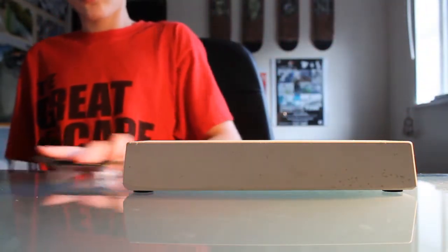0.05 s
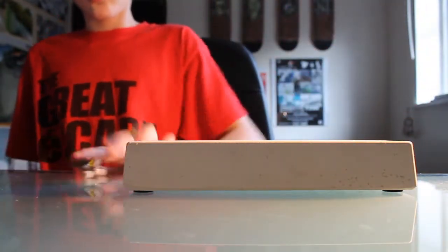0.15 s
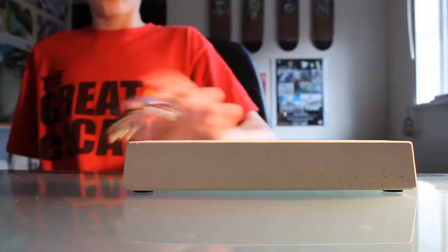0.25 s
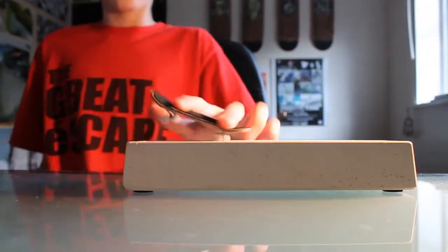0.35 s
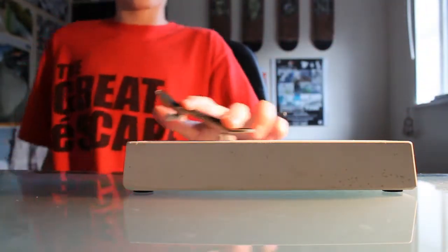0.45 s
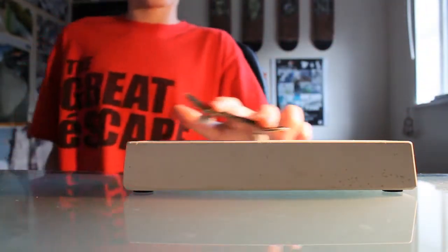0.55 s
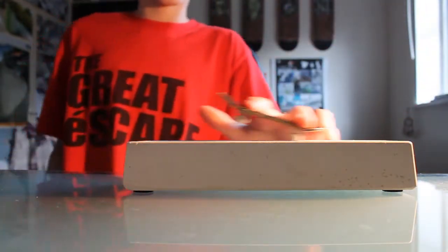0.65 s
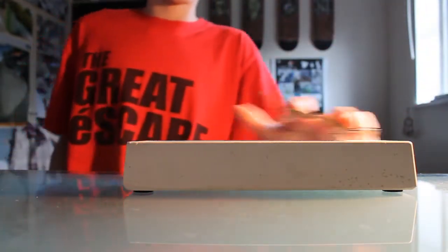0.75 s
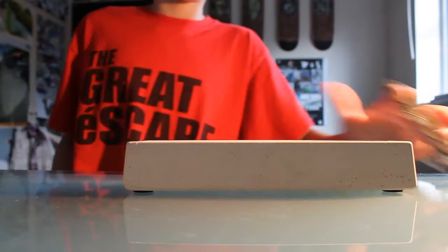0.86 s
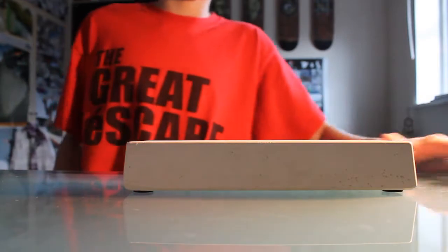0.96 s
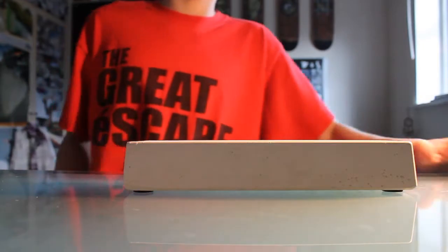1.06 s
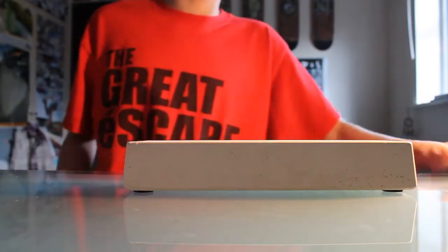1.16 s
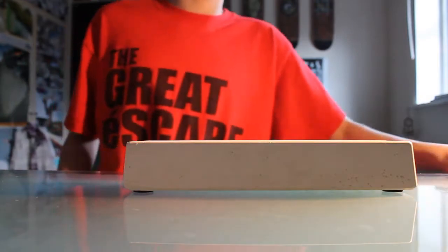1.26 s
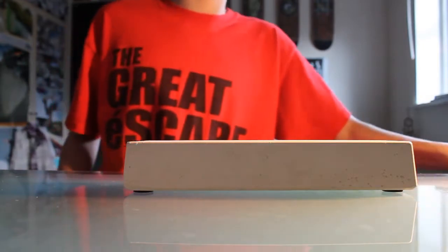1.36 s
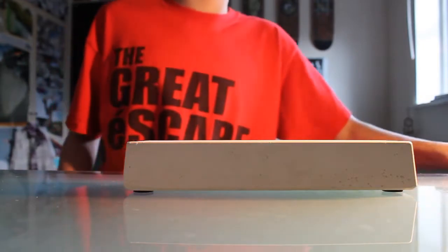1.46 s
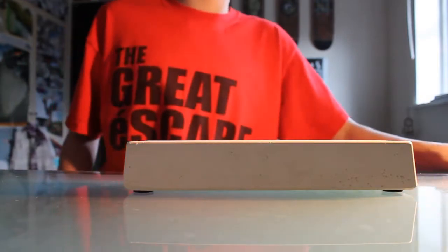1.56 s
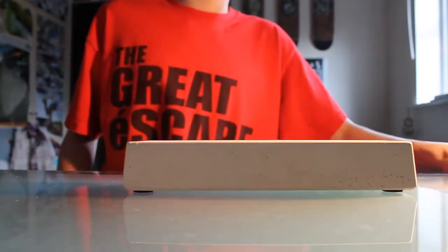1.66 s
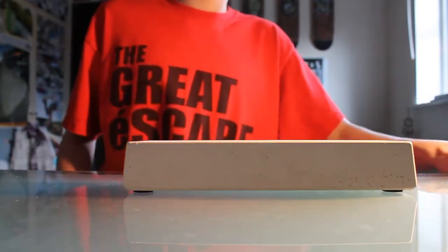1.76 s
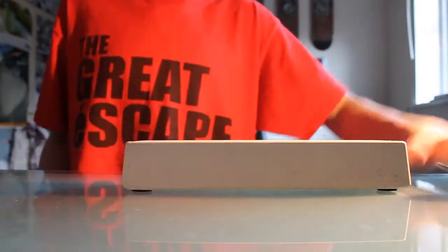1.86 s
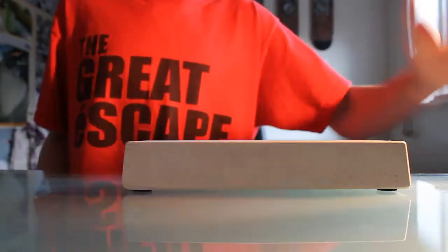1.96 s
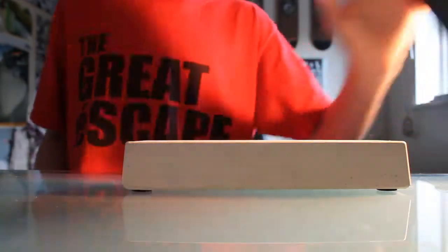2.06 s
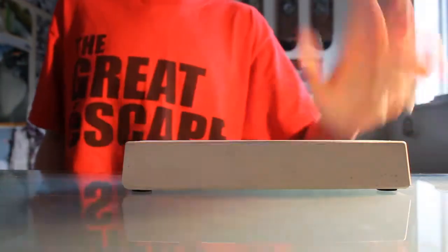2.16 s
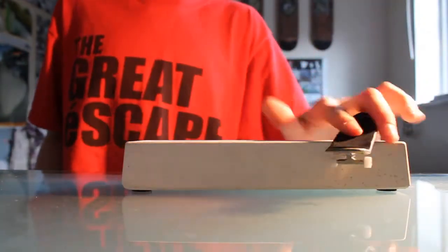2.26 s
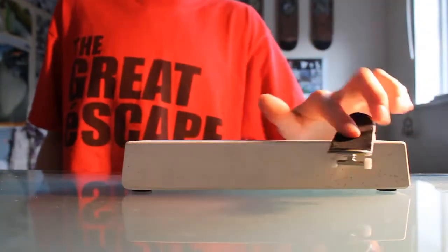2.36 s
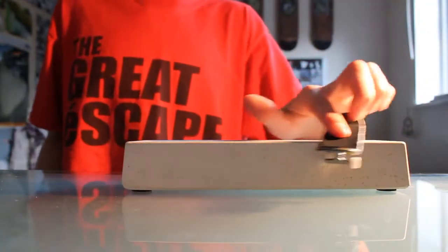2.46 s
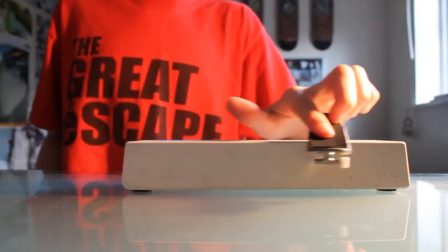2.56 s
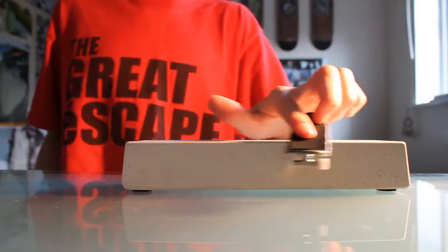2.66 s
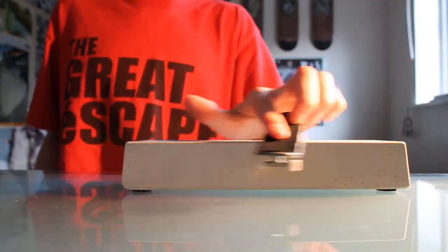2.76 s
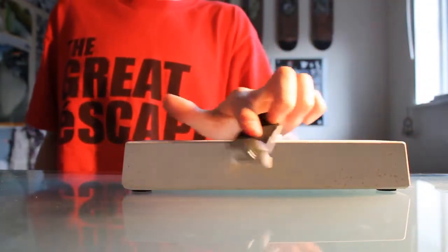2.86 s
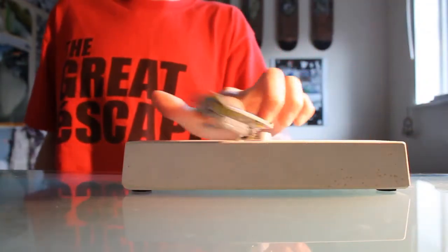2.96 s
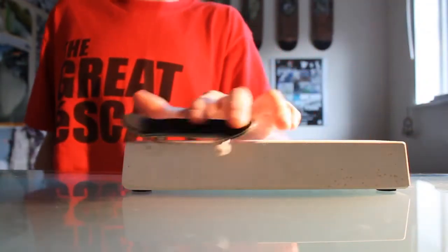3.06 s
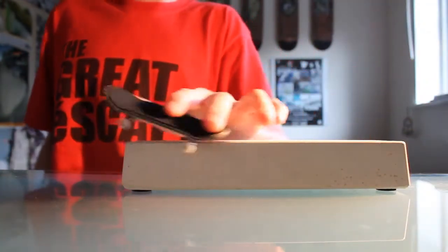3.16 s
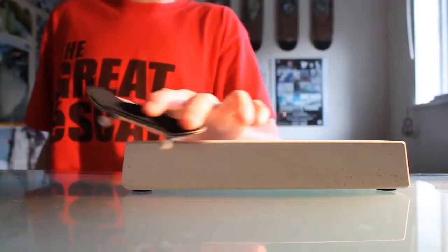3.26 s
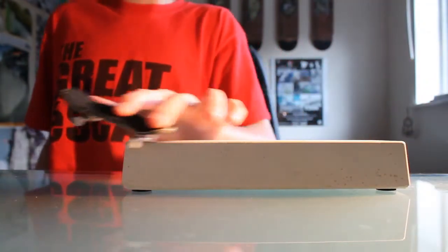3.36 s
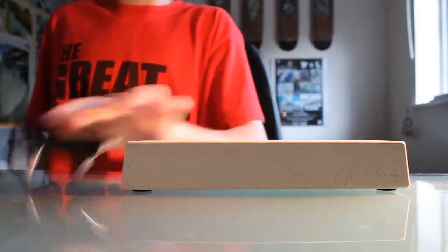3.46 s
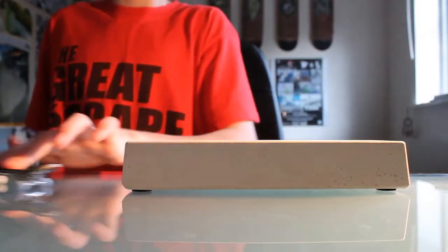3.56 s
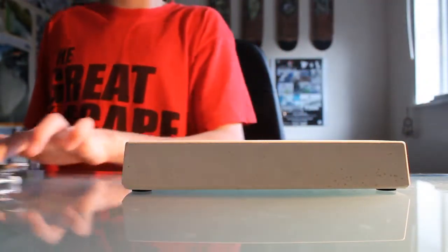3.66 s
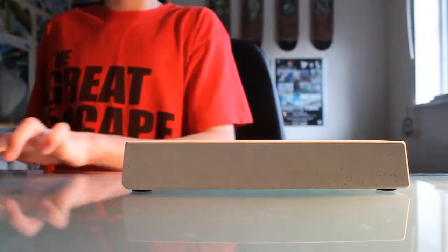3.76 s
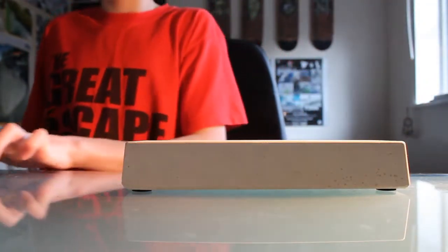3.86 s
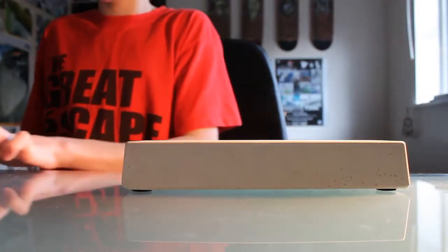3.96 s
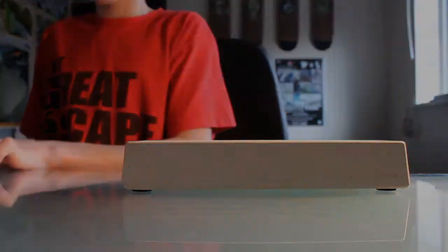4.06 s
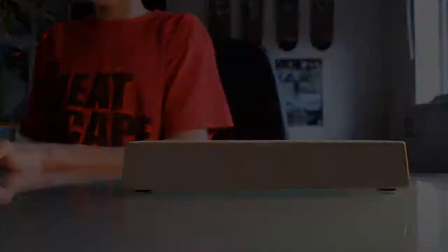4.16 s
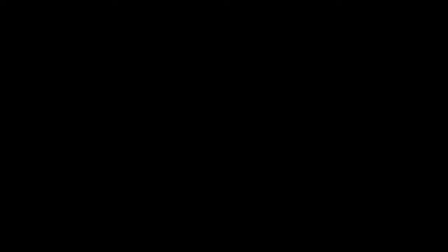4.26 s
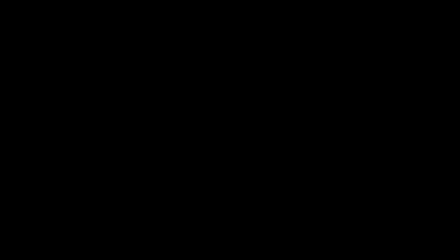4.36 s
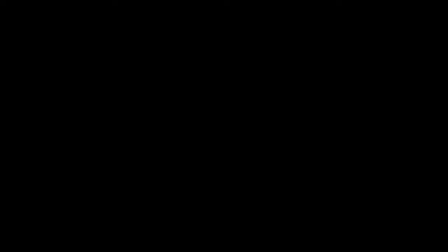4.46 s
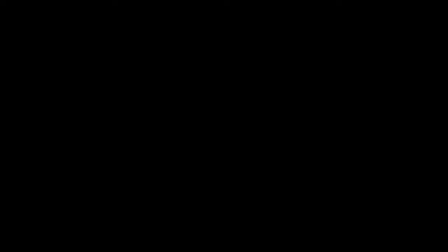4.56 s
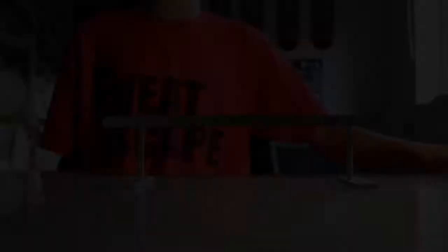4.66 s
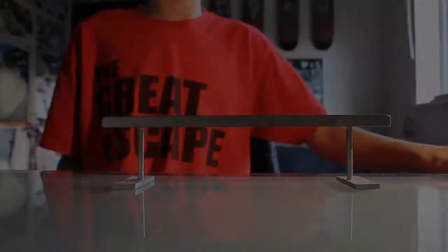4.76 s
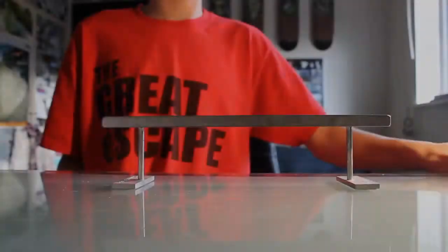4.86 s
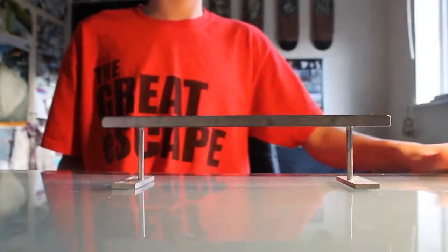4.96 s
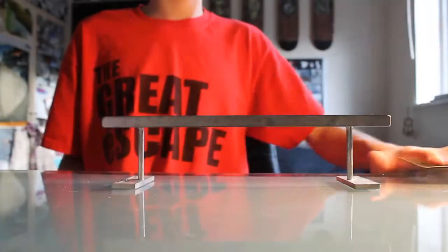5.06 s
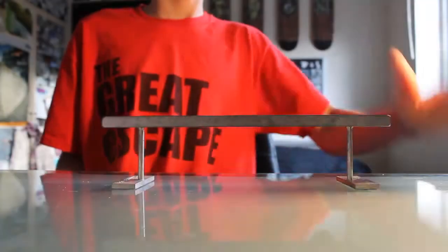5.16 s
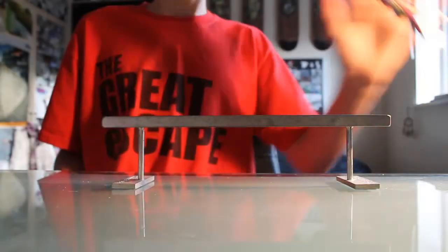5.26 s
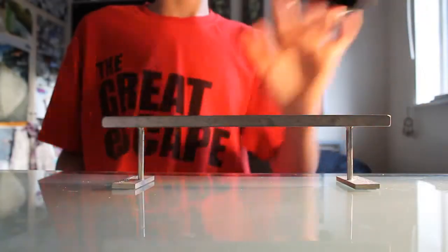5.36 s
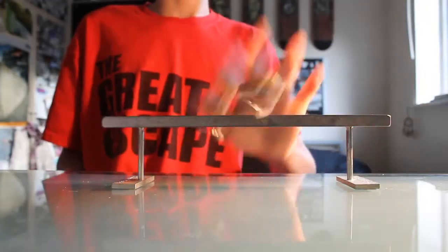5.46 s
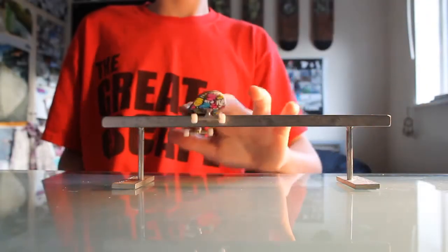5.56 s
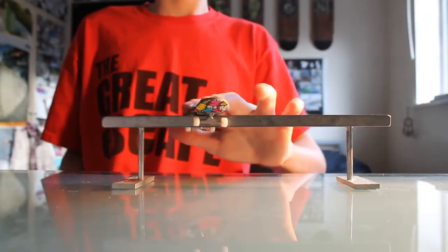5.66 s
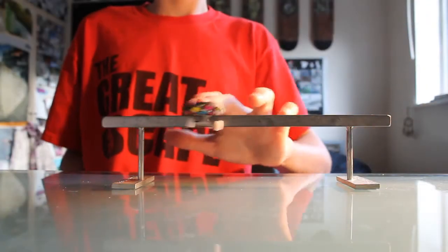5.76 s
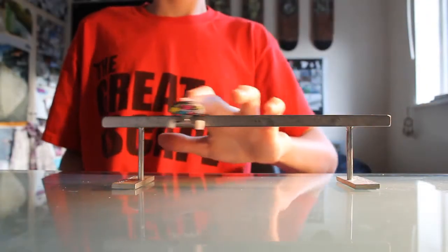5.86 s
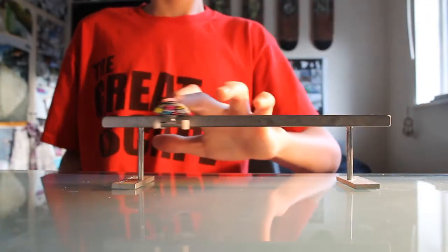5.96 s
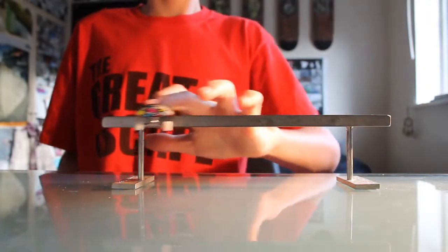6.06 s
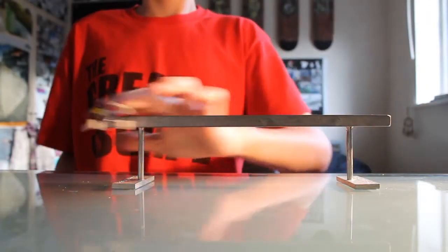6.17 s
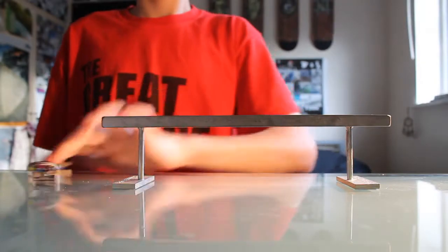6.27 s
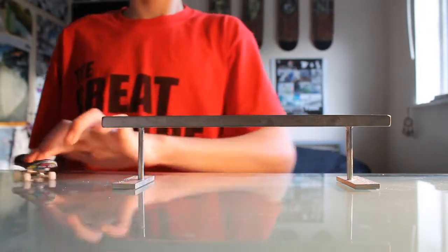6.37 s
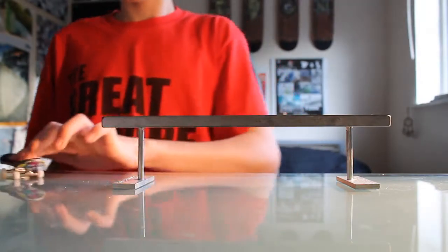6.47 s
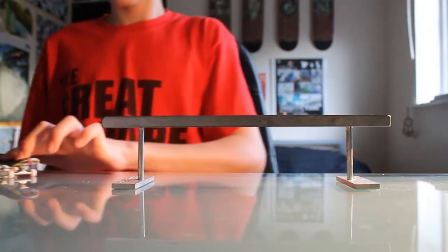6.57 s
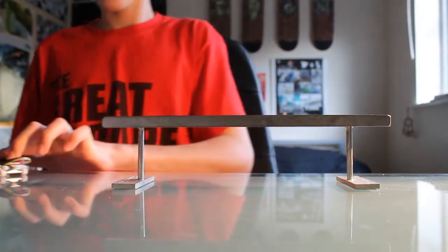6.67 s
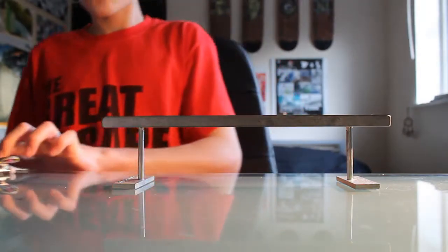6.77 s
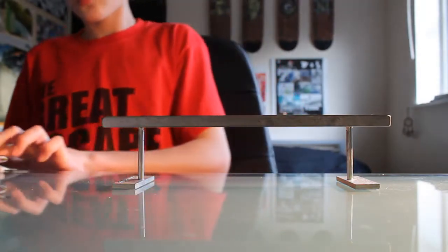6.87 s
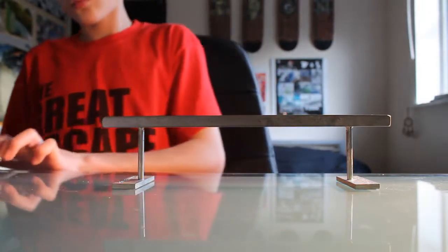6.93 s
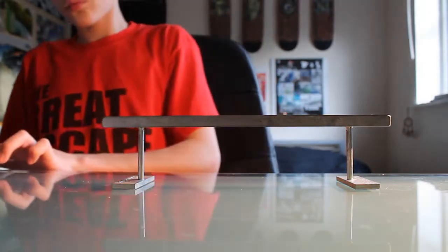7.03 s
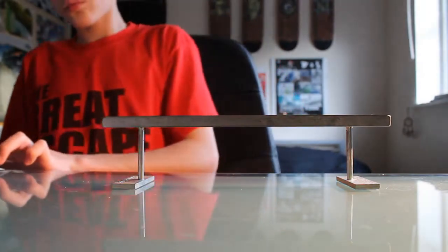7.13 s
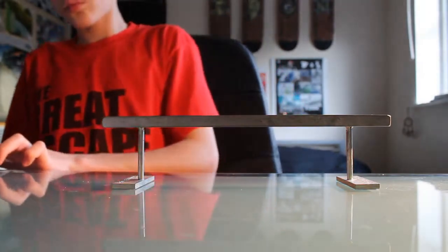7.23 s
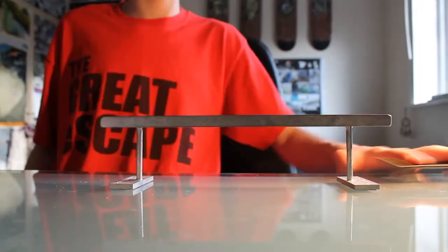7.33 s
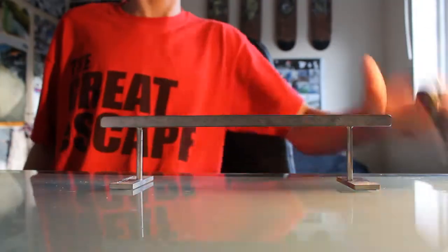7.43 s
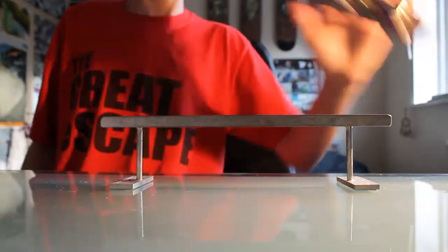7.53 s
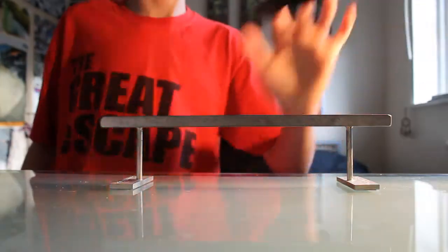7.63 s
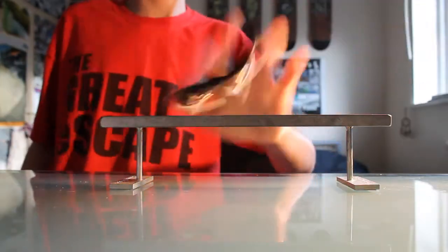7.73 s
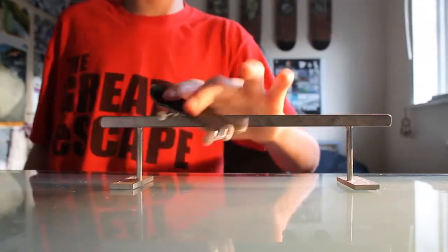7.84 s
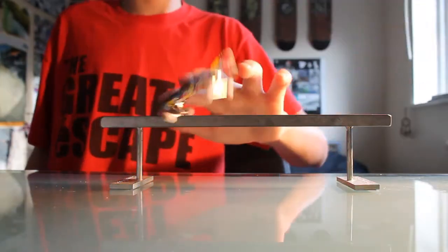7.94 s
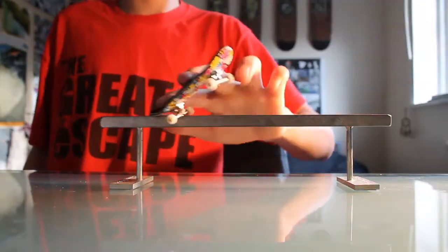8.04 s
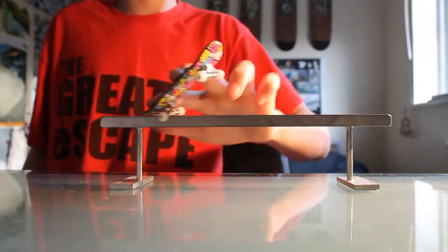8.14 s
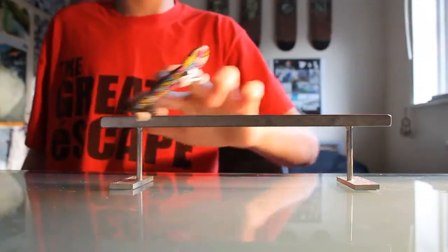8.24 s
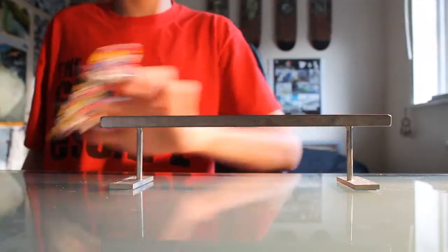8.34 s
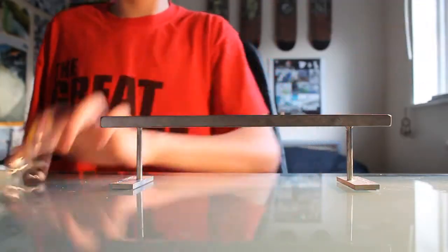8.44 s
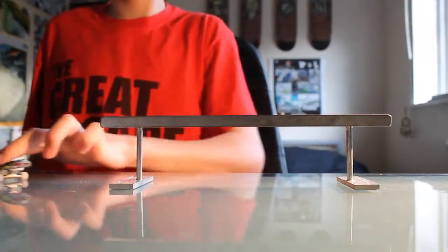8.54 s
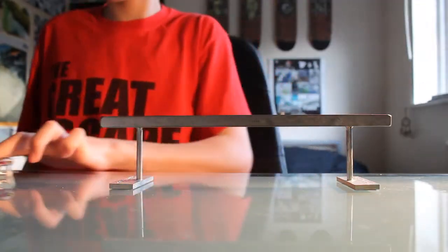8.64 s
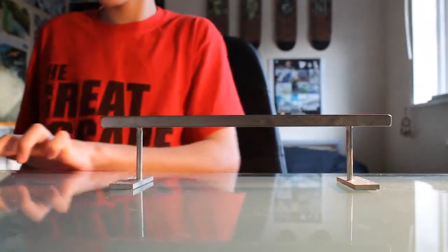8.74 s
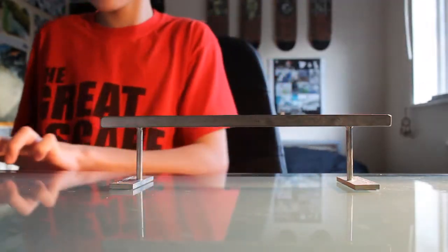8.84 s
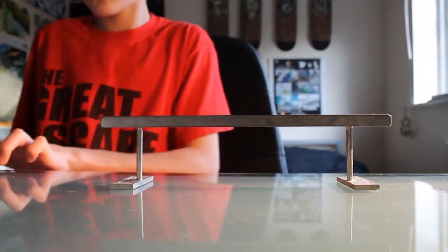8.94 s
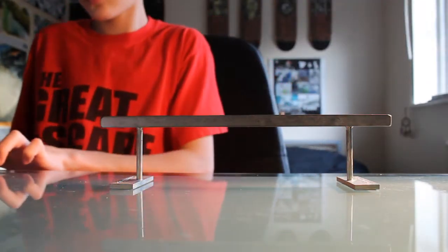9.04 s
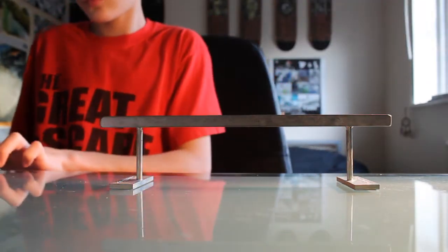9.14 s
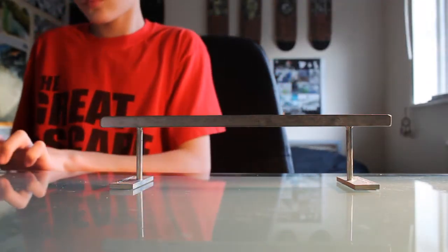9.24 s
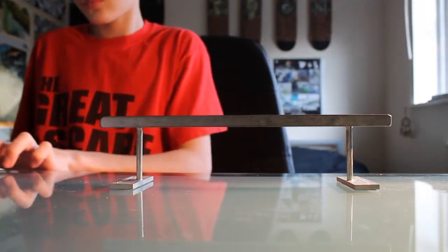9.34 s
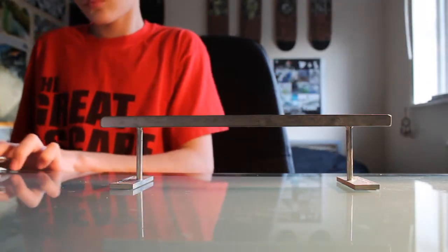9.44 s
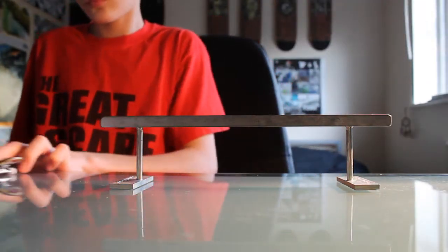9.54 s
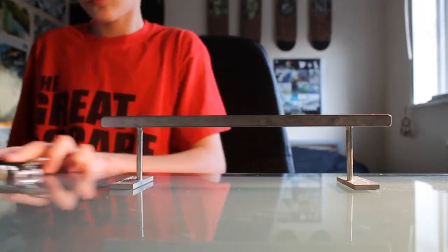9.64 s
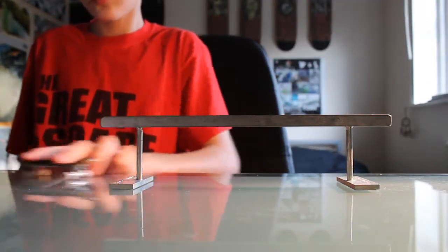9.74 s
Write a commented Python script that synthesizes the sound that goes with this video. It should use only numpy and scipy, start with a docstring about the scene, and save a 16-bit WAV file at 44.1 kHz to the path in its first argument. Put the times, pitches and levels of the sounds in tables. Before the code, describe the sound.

Close, sharp clacks and short gritty rolls of a toy skateboard on glass, with ledge scrapes, a silent gap, then ringing metal rail hits.

```python
"""Toy skateboard on a glass table

A hand-ridden toy board, close to a small camera in a bedroom: noise through resonances makes wheels roll,
and slide along a stone ledge and a steel rail. Noise bursts make pops and clacks in deck, glass and room;
decaying sines ring the rail, sines of wavering pitch squeak, and shaped noise is the room tone.
The loudest clacks saturate the camera; a cut between two scenes is silent."""
import sys
import numpy as np
from scipy import signal
from scipy.fft import rfft, irfft, next_fast_len
from scipy.io import wavfile
from scipy.ndimage import map_coordinates

SR = 44100
rng = np.random.default_rng(int(sys.argv[2]) if len(sys.argv) > 2 else 0)


def to_wav(s):
    """Save 16-bit WAV."""
    ch = np.atleast_2d(s).T  # columns
    pcm = np.round(np.clip(ch, -1, 1) * 32767)  # PCM
    wavfile.write(sys.argv[1], SR, pcm.astype(np.int16))


N = 432180
T = np.arange(N) / SR
TAIL = SR * 2 // 5  # samples that a contact lasts
CONTACT_TIME = T[:TAIL]


def amp(db):
    """Decibel law: the amplitude gain of a level in dB."""
    return 10 ** (np.asarray(db) / 20)


def unit(x):
    """Normalisation to unit root-mean-square amplitude."""
    return x / np.sqrt(np.mean(x ** 2) + 1e-20)


def peak(rows):
    """Normalisation of each row to unit peak amplitude."""
    return rows / np.abs(rows).max(axis=1, keepdims=True)


def along(points, hz):
    """Interpolation of (frequency [Hz], value) points on a logarithmic frequency axis."""
    f, value = np.transpose(points)
    return np.interp(np.log(hz + 1), np.log(f + 1), value)


def filtered(x, response):
    """Linear filtering: the spectrum of x times a complex frequency response."""
    m = next_fast_len(x.shape[-1] + 4096, real=True)
    spectrum = rfft(x, m) * response(np.fft.rfftfreq(m, 1 / SR))
    return irfft(spectrum, m)[..., :x.shape[-1]]


def body(modes):
    """Modal superposition: damped resonators (frequency [Hz], width [Hz], level [dB]), signs alternating."""
    def response(f):
        total = 0
        for k, (centre, width, db) in enumerate(modes):
            resonance = 1j * f * width / (centre * centre - f * f + 1j * f * width)
            total = total + (-1) ** k * amp(db) * resonance
        return total
    return response


def wobble(rate):
    """Slow random modulation: a smooth curve through random knots, rate knots a second."""
    knots = rng.standard_normal(int(N * rate / SR) + 4)
    return map_coordinates(knots, [T * rate])


def strokes(tables, second_db):
    """Level envelopes: a main layer and a second one bound to it by a law; silent between strokes."""
    main, second = np.zeros(N), np.zeros(N)
    for k, (s, db) in enumerate(map(np.transpose, tables)):
        edge = np.clip(np.minimum(T - s[0] + .004, s[-1] - T + .004) / .008, 0, 1)
        level_db = np.interp(T, s, db)
        main += edge * amp(level_db)
        second += edge * amp(second_db(k, level_db))
    return np.array([main, second])


def grit(flutter, lump_db, grain_db):
    """Roughness excitation: noise modulated by bumps of the wheel and by tiny grains."""
    return rng.standard_normal(N) * amp(lump_db * flutter + grain_db * wobble(900))


# Reverberation of the bedroom: (frequency [Hz], 60 dB decay time [s])
ROOM_DECAY = [(100, 1), (250, 0.63), (1500, 0.24), (4000, 0.3), (10000, 0.25)]


def tails(count):
    """Diffuse reverberation: noise of unit energy, decaying by band, built up as first walls arrive."""
    hz, t, z = signal.stft(rng.standard_normal((count, TAIL)), SR, nperseg=256)
    decay = amp(-60 * t / along(ROOM_DECAY, hz)[:, None])
    tail = signal.istft(z * decay, SR, nperseg=256)[1][:, :TAIL]
    tail = tail * (1 - np.exp(-CONTACT_TIME / 0.014))
    return tail / np.linalg.norm(tail, axis=1, keepdims=True)


def room_smear(dry):
    """Convolution with the room: the direct sound plus its diffuse reverberation."""
    return amp(-0.5) * dry + amp(-9.0) * signal.fftconvolve(dry, tails(count=1)[0])[:N]


# Pitch around which the moving deck is freest: (time [s], frequency [Hz])
FAVOURED_PITCH = [(.1, 1170), (1.7, 1420), (1.82, 867), (3.65, 1340), (3.93, 1540), (4.02, 980),
                  (5.0, 1050), (5.1, 1490), (6.9, 1254), (8.7, 1500), (9.7, 1063)]
FAVOUR_DB, FAVOUR_OCTAVES = 7.5, 0.18  # height used while rolling; width


def pressed(drive, modes, shift_db, favour_db=0):
    """Variable damping: a shifting grip frees each mode in its own time; the total stays even.

    Modes near the favoured pitch are raised by favour_db."""
    def each_mode(hz):
        return np.array([(-1) ** k * body([mode])(hz) for k, mode in enumerate(modes)])

    voices = filtered(drive, each_mode)
    pitch = np.interp(T, *np.transpose(FAVOURED_PITCH))
    octaves_off = np.log2(np.transpose(modes)[0, :, None] / pitch)
    shifts_db = shift_db * np.array([wobble(7) for _ in modes])
    grip = amp(shifts_db + favour_db * np.exp(-(octaves_off / FAVOUR_OCTAVES) ** 2 / 2))
    power = np.mean(voices ** 2, axis=1, keepdims=True)
    return np.sum(grip * voices, axis=0) / np.sqrt(np.sum(grip ** 2 * power, axis=0))


# Spectrum of room tone and camera hiss: (frequency [Hz], relative density [dB per Hz])
AIR_SPECTRUM = [(25, -29), (117, -7), (256, -4.5), (1560, -16), (2610, -20.5), (5140, -22.5),
                (16000, -38.5)]
AIR_DB = -53.5


def air():
    """Stationary background noise of fixed spectrum, its level drifting a little."""
    noise = unit(filtered(rng.standard_normal(N), lambda hz: amp(along(AIR_SPECTRUM, hz))))
    return amp(AIR_DB + wobble(5.6)) * noise


# Tail snaps on the glass: (time [s], crack [dB], weight of the blow [dB],
# brightness [dB per octave], loudest mode [Hz]); the weight feeds deck, table and room
POPS = [(.2228, 4, -7, 5, 3580), (1.933, 1, -7, 4, 3370), (5.1952, 3, -5.5, 6.5, 3360),
        (7.4447, 2.5, -9, 8, 3340)]
# Hard pushes: (start [s], rumble [dB], fastest [s], rumble [dB])
PUSHES = [(.005, -26, 0.14, -26), (1.796, -28.5, 1.865, -22), (4.901, -51, 5.107, -16),
          (7.263, -40.5, 7.36, -17.5), (9.549, -44, 9.765, -23.5)]
# Free rolling, one table a roll: (time [s], rumble [dB])
COASTS = [
    [(1.01, -29), (1.064, -33.5), (1.162, -35), (1.238, -30.5), (1.412, -43.5), (1.46, -83)],
    [(3.59, -24.5), (3.88, -30.5), (3.91, -27.5), (4.002, -33.5), (4.03, -46.5), (4.174, -42.5),
     (4.22, -84)],
    [(6.37, -20), (6.416, -30.5), (6.662, -39.5), (6.816, -32.5), (6.896, -39.5), (7.19, -55.5),
     (7.23, -69)],
    [(8.52, -19.5), (8.712, -38.5), (8.86, -39.5), (8.914, -34.5), (9.07, -68)],
    [(9.17, -50.5), (9.266, -42), (9.478, -43), (9.532, -37), (9.55, -48)],
    [(4.83, -52), (4.838, -33.5), (4.9, -57)],
    [(1.5, -82), (1.524, -46.5), (1.542, -59.5), (1.692, -39), (1.76, -69)],
]
# Hiss of the wheels, which grows with speed: (level over a rumble of -25 dB [dB], extra [dB per dB of rumble])
PUSH_HISS = (-5.5, 0.11)
COAST_HISS = (-10, 0.3)
# Resonances of the deck: (frequency [Hz], width [Hz], level [dB])
DECK = [(427, 150, -12.5), (688, 58, -6), (857, 59, -2), (1179, 140, -3), (1387, 47, 1), (1574, 61, 0),
        (1919, 63, -8)]
# Resonances of the metal trucks: (frequency [Hz], width [Hz], level [dB])
TRUCKS = [(2340, 500, 5), (3500, 610, 6.5), (5000, 1400, 0), (7900, 1400, -5.5), (10000, 7200, -26)]
LIFT_S, LIFT_DB = 0.039, -16  # the load comes off the wheels as the tail goes down
ROLL_IN_DB = -15  # they roll on lightly into the pop


def rolling():
    """Roughness-driven resonance: wheel noise rumbles in the deck's low modes and hisses in the metal."""
    pop_times = [pop[0] for pop in POPS] + [N / SR + 1]  # the last push runs on past the end
    pushes = []
    for (s, db, top_s, top_db), pop_s in zip(PUSHES, pop_times):
        lift = (top_s + LIFT_S, top_db + LIFT_DB)
        pushes.append([(s, db), (top_s, top_db), lift, (pop_s, top_db + ROLL_IN_DB)])

    def hiss_law(over_db, grows):
        return lambda k, db: db + over_db + grows * (db + 25)

    rumble, hiss = strokes(pushes, hiss_law(*PUSH_HISS)) + strokes(COASTS, hiss_law(*COAST_HISS))
    flutter = wobble(55)
    drive = grit(flutter, lump_db=1.5, grain_db=3.5)
    deck = rumble * pressed(drive, DECK, shift_db=3.5, favour_db=FAVOUR_DB)
    metal = hiss * unit(filtered(grit(flutter, lump_db=2.0, grain_db=2.0), body(TRUCKS)))
    return deck + metal


# Blows on each surface: (time [s], crack [dB], weight of the blow [dB],
# brightness [dB per octave], loudest mode [Hz])
ON_LEDGE = [(0.3598, 3, -7.5, -2, 2860), (2.228, 6, -3, 4.5, 2900), (2.2683, -4, -10, -5, 3950),
            (3.034, -3, -8, -4.5, 2570), (3.0697, 4.5, -8.5, -11, 2830), (3.4682, -7, -16, -4.5, 3740)]
ON_RAIL = [(5.5242, 0.5, -7, 3.5, 3460), (5.5566, 1.5, -2, 0.5, 3830), (6.2571, -2, -12, 12, 2700),
           (7.7466, 6.5, -2, 0, 2550), (7.7733, 0, 1.5, -2, 2630), (7.9814, -9.5, -20.5, 7.5, 3200)]
ON_GLASS = [(.9324, 3, -8, 7, 3730), (.95, -11.5, -1.5, -2.5, 3075), (.9678, 5.5, 3.5, -2, 1720),
            (3.5203, 7.5, 1.5, 2, 2180), (3.5534, -1, -0.5, 2, 2200), (4.52, -4, -7, -2.5, 2000),
            (6.304, 9, -2, 5.5, 1600), (6.3165, 1, 3, -1, 1750), (8.465, 5, -4.5, 5, 5100),
            (8.4775, 3.5, 4, 2, 1904)]
# Small taps of wheels and deck while the board moves:
# (time [s], crack [dB], brightness [dB per octave], loudest mode [Hz])
TICKS = [(2.519, -17, 1.5, 5000), (4.067, -19.5, -14, 2040), (4.836, -35, -17, 1870), (8.086, -24, 6, 3450),
         (9.1264, -23, -11, 1900), (9.3415, -33, -10, 2010), (9.611, -30, -8.5, 2450)]
# Single grains catching under the sliding board: (time [s], crack [dB])
SCRATCHES = [(0.567, -27.5), (0.6424, -24.5), (2.68, -29), (2.7227, -27.5), (2.82, -27), (3.423, -28),
             (8.3057, -18.5)]
# Chatter of the trucks around a blow: (time [s], crack [dB])
REBOUNDS = [(0.3565, -14), (1.938, -10.5), (2.2360, -2), (2.2728, -10), (3.531, -5), (5.533, 2),
            (5.5422, -1.5), (5.561, -7.5), (7.782, 6.5), (7.7907, -2.5), (8.493, -7.5)]
# What each kind of contact wakes, over its weight: (deck knock [dB], table thud [dB], glass note [dB])
WAKES = dict(pop=(-10.5, -25, -9.5), ledge=(-10, -17.5, -31), rail=(-16, -20.5, -30),
         glass=(-5, -29.5, -18.5), tick=(3, -21, -14.5), rebound=(1.4, -13, -20.5))
SCRATCH_COLOUR = 1, 5000  # brightness in dB per octave, loudest mode in Hz
REBOUND_COLOUR = 6.5, 3300
TICK_WEIGHT_DB, REBOUND_WEIGHT_DB = -12.5, -19  # over the crack; scratches weigh as ticks do


def contacts():
    """Impact parameters: every contact as a row of strength, colour and coupling; returns the columns."""
    light = TICKS + [(*row, *SCRATCH_COLOUR) for row in SCRATCHES]
    ticks = [(s, db, db + TICK_WEIGHT_DB, *colour) for s, db, *colour in light]
    rebounds = [(s, db, db + REBOUND_WEIGHT_DB, *REBOUND_COLOUR) for s, db in REBOUNDS]
    # pops, then ledge blows, come first: the sharp deck modes rely on it
    kinds = dict(pop=POPS, ledge=ON_LEDGE, rail=ON_RAIL, glass=ON_GLASS, tick=ticks, rebound=rebounds)
    rows = [(*row, *WAKES[kind]) for kind, table in kinds.items() for row in table]
    return np.transpose(rows)[:, :, None]


# Spectrum of a crack: (frequency [Hz], relative density [dB per Hz])
CRACK = [(300, -58), (1500, -12), (2300, -3), (3800, -2.5), (6150, -4.5), (11400, -15.5), (16000, -22)]
# Resonances of the table on its supports: (frequency [Hz], width [Hz], level [dB])
TABLE = [(93, 62, -9.5), (132, 22, 2.5), (233.3, 50, 2.5), (288, 85, -2.5)]
# Resonance of the glass pane: (frequency [Hz], width [Hz], level [dB])
GLASS = [(486, 64, 3.5)]
# The deck's least damped modes: (frequency [Hz], width [Hz], level [dB])
SHARP = [(1567, 26, 2), (5126, 140, -10.5)]
# Their peak over the weight of each pop, then of each blow on the ledge: (level [dB])
SHARP_DB = [-22.5, -17, -5, -5.5, -7, -9.5, -8.5, -2, -11, 0]
MODE_DB, MODE_OCTAVES = 7.5, 0.13  # height and width of the loudest mode
UNDER_MODE_DB, RIPPLE_DB = -5, 2  # loss an octave below it; scatter of the other modes
ANSWER_DB, WOODY_ANSWER_DB = 21.5, 8.5  # room over the weight; the deck's share in it over the knock
BUZZ_DB, BUZZ_T60_S = -9, 0.049  # the board buzzes on after the crack


def clacks():
    """Impulse excitation: each contact is a crack, deck knock, room answer, table thud and glass note."""
    s, crack_db, weight_db, tilt_db, mode_hz, knock_db, thud_db, glass_db = contacts()
    t, count = CONTACT_TIME, len(s)
    noise = rng.standard_normal((count, 4, TAIL))
    # every contact point wakes its own mix of the board's dense high modes
    scatter = RIPPLE_DB * rng.standard_normal((count, 60))

    def dying(x, rise_s, t60_s):
        return x * (1 - np.exp(-t / rise_s)) * amp(-60 * t / t60_s)

    def ripple_db(hz):
        return np.array([np.interp(hz, np.linspace(0, SR / 2, len(k)), k) for k in scatter])

    def bright(hz):
        octaves = np.log2((hz + 1) / mode_hz)
        loudest_db = MODE_DB * np.exp(-(octaves / MODE_OCTAVES) ** 2 / 2)
        below_db = UNDER_MODE_DB * np.clip(-octaves, 0, 1)
        slope_db = tilt_db * np.log2((hz + 1500) / 5500)
        return amp(loudest_db + below_db + along(CRACK, hz) + slope_db + ripple_db(hz))

    def uneven(hz):
        return bright(hz) * amp(ripple_db(hz))

    def answer(hz):
        return uneven(hz) + amp(WOODY_ANSWER_DB) * amp(knock_db) * body(DECK)(hz)

    burst = dying(noise[:, 0], 0.00031, 0.0057)
    crack = peak(filtered(burst, bright))
    knock = peak(filtered(burst, body(DECK)))
    far = filtered(tails(count), answer) * np.clip(t / 0.0013, 0, 1)
    # the pane keeps rocking on its supports, so its low modes are fed for a while
    thud = peak(filtered(dying(noise[:, 1], 0.00084, 0.32), body(TABLE)))
    note = peak(filtered(dying(noise[:, 2], 0.0043, 0.16), body(GLASS)))
    buzz = peak(filtered(dying(noise[:, 3], 0.00029, BUZZ_T60_S), uneven))

    near = amp(crack_db) * (crack + amp(BUZZ_DB) * buzz)
    woken = amp(knock_db) * knock + amp(ANSWER_DB) * far + amp(thud_db) * thud + amp(glass_db) * note
    sound = near + amp(weight_db) * woken
    free = slice(len(SHARP_DB))  # the pops and the ledge blows
    sound[free] += amp(weight_db[free] + np.c_[SHARP_DB]) * peak(filtered(burst[free], body(SHARP)))

    out = np.zeros(N + SR)
    for start, row in zip(s[:, 0], sound):
        out[round(start * SR):][:TAIL] += row
    return out[:N]


# Riding or sliding on ledge or rail, one table a slide: (time [s], scrape [dB])
SLIDES = [
    [(0.5, -57), (0.54, -40.5), (0.794, -43), (0.845, -25.5), (0.925, -52.5)],
    [(2.49, -44), (2.53, -39), (2.616, -45.5), (2.734, -30), (2.892, -34.5), (3.002, -57.5), (3.025, -37.5)],
    [(6.12, -67.5), (6.17, -52.5), (6.218, -39.5), (6.25, -37)],
    [(7.93, -54), (7.996, -36), (8.042, -69), (8.2, -57)],
    [(8.22, -53), (8.342, -19.5), (8.372, -42), (8.45, -67.5)],
]
# Deck hum of each slide at a scrape of -35 dB: (level [dB])
HUM_DB = [-37.5, -48, -47.5, -41, -48.5]
# Resonances of the underside in a flat slide: (frequency [Hz], width [Hz], level [dB])
UNDERSIDE = [(2550, 300, 2), (3720, 270, 5), (5050, 2100, -6), (5860, 350, -0.5), (7300, 560, -15),
             (10400, 5100, -31)]
# Resonances of the deck rubbing the rail: (frequency [Hz], width [Hz], level [dB])
BAR = [(3080, 670, 0), (5000, 1700, -7), (7000, 2400, -8)]
HUM_GROWS = 0.6  # dB per dB: the hum swings less than the scrape


def sliding():
    """Friction excitation: rubbing grains drive the deck's low modes and the high modes of the contact."""
    scrape, hum = strokes(SLIDES, lambda k, db: HUM_DB[k] + HUM_GROWS * (db + 35))
    # the first slide rides on wheels, the first two are on the ledge, the second and third are flat
    on_wheels, on_stone, flat = (T < slide[0][0] for slide in SLIDES[1:4])
    flutter = wobble(55)
    drive = grit(flutter, lump_db=1.5, grain_db=3.5)
    deck = hum * pressed(drive, DECK[1::2], shift_db=2.0)  # an edge under the deck leaves fewer modes free

    rub = grit(flutter, lump_db=3.0, grain_db=2.5)
    wheel_rub = pressed(rub, TRUCKS, shift_db=4.2)
    flat_rub = pressed(rub, UNDERSIDE, shift_db=1.0)
    rail_rub = pressed(rub, BAR, shift_db=0.5)
    edge = scrape * np.select([on_wheels, flat], [wheel_rub, flat_rub], rail_rub)

    rocking = rng.standard_normal(N) * amp(6.1 * wobble(16))  # the ledge rocks on the glass
    pane = amp(-9.5) * hum * on_stone * unit(filtered(rocking, body(TABLE)))
    return deck + edge + pane


# Low bumps of the ledge rocking on the pane: (time [s], level [dB])
BUMPS = [(.845, -36.5), (2.384, -32.5), (2.477, -31.5)]
BUMP_T60_S = 0.25


def bumps():
    """Low-frequency modal excitation: soft, decaying pushes into the table's resonances."""
    push = np.zeros(N)
    for s, db in BUMPS:
        decay = amp(db - 60 * np.clip(T - s, 0, 1) / BUMP_T60_S)
        push += decay * np.clip((T - s) / 0.016, 0, 1)
    return push * unit(filtered(rng.standard_normal(N), body(TABLE)))


# Short squeaks of wheel or deck: (time [s], length [s], pitch [Hz], level [dB])
SQUEAKS = [(2.563, 0.034, 1200, -39), (2.66, 0.035, 1240, -38), (4.146, 0.04, 1170, -39),
           (9.244, 0.039, 1270, -32)]
SQUEAK_WAVER = 0.012  # share of the pitch


def squeaks():
    """Stick-slip oscillation: a tone of wavering pitch under a soft swell."""
    wavering_time = np.cumsum(1 + SQUEAK_WAVER * wobble(120)) / SR
    out = np.zeros(N)
    for s, length, hz, db in SQUEAKS:
        swell = np.sin(np.pi * np.clip((T - s) / length, 0, 1))
        out += amp(db) * swell * np.sin(2 * np.pi * hz * wavering_time)
    return out


# Modes of the bar, in families that a blow wakes together:
# (frequency [Hz], level [dB], 60 dB decay time [s])
RAIL_MODES = dict(a=[(2284.8, 0, 8)], b=[(4361.8, 0, 3.2), (4357.2, -4.4, 3.2)], c=[(7062.1, 0, 3)],
              d=[(7057.1, -4.4, 3), (10530, -9, .6)], foot=[(877, 0, .2)], top=[(14090, 0, .36)],
              pinned=[(4361.8, 0, 1.8), (7062.1, 4, .5)], held=[(6590, 0, .5), (9035, -10, .25),
               (12580, -19, .4), (15120, -15, .3)])
# Rings of the rail until something damps it: (start [s], damped [s], level of each sounding family [dB])
RINGS = [(4.649, 5.195, dict(a=-51.5)), (5.2, 5.53, dict(a=-53.5)),
         (5.527, 5.952, dict(pinned=-36.5, foot=-16.5)), (5.594, 5.952, dict(top=-28)),
         (6.257, 6.307, dict(a=-34.5, b=-34, c=-40.5, foot=-28)),
         (6.305, 7.444, dict(a=-35.5, b=-37, c=-39, d=-35.5, foot=-18, top=-39)),
         (7.452, 7.744, dict(a=-52)), (7.753, 7.772, dict(foot=-10.5, held=-19)),
         (7.799, 7.987, dict(c=-37, foot=-20, held=-22)), (7.986, 8.215, dict(foot=-37.5, c=-57)),
         (8.324, 8.454, dict(foot=-34, held=-27)), (8.478, 9.801, dict(a=-54.5, b=-54.5))]


def rail():
    """Free bending vibration of a bar: decaying sines, where weaker near twins beat slowly."""
    out = np.zeros(N)
    for s, stop, families_db in RINGS:
        t = T[:round((min(stop + .02, N / SR) - s) * SR) - 1]
        gate = (1 - np.exp(-t / .003)) * np.clip((stop - s + .02 - t) / .02, 0, 1)
        for family, family_db in families_db.items():
            for hz, db, t60 in RAIL_MODES[family]:
                decay = amp(db + family_db - 60 * t / t60)
                out[round(s * SR):][:len(t)] += decay * gate * np.sin(2 * np.pi * hz * t)
    return out


def scene():
    """Linear superposition of all sources at one microphone."""
    friction = room_smear(rolling() + sliding())
    return (air() + friction + clacks() + bumps() + squeaks() + rail())[None]


# The silent cut between two scenes: (from [s], to [s])
CUT = (4.331, 4.661)
TOP_HZ = 16200  # middle of the fade at the top of the band


def record(dry):
    """Saturation and band limiting: peaks flatten near full scale, the cut is silent, the top is removed."""
    clipped = dry / (1 + np.abs(dry / .98) ** 8) ** (1 / 8)
    live = (T < CUT[0]) | (T > CUT[1])
    return filtered(clipped * live, lambda hz: np.clip((TOP_HZ + 300 - hz) / 600, 0, 1) ** 2)


dry = scene()
out = record(dry)
to_wav(out)
```